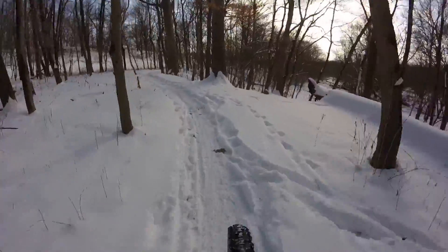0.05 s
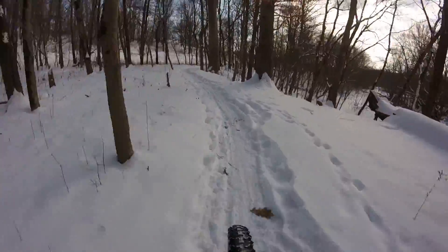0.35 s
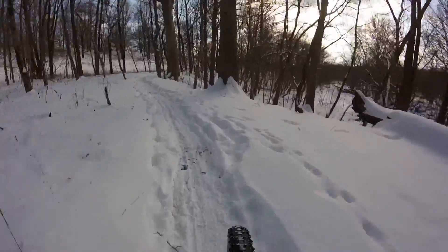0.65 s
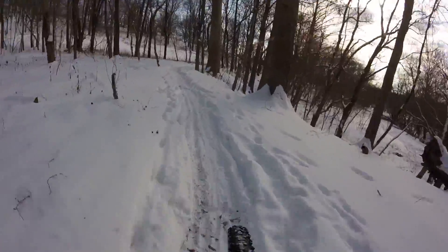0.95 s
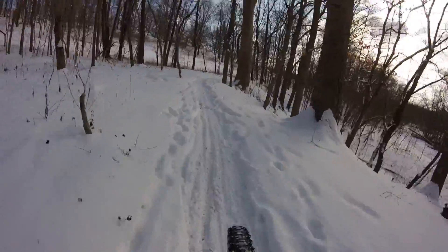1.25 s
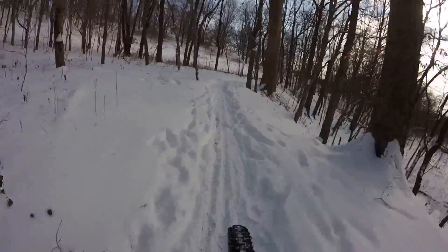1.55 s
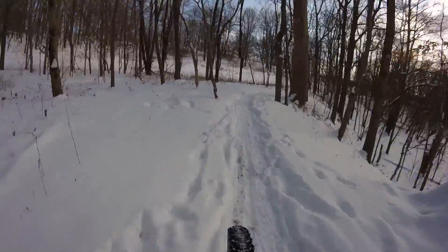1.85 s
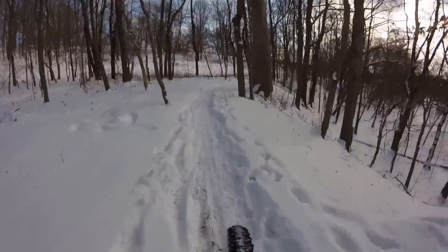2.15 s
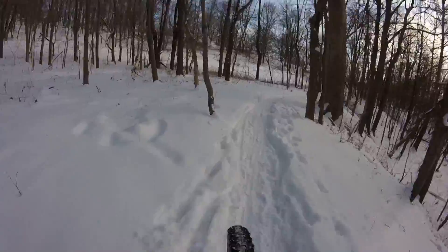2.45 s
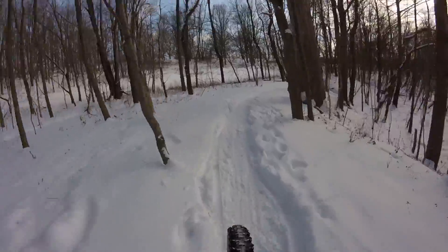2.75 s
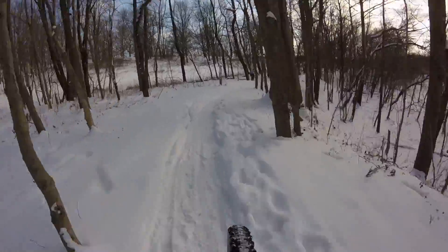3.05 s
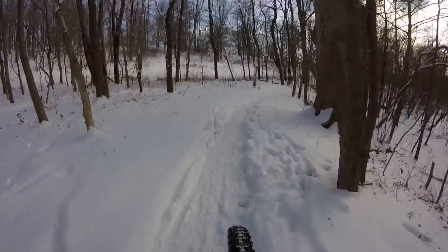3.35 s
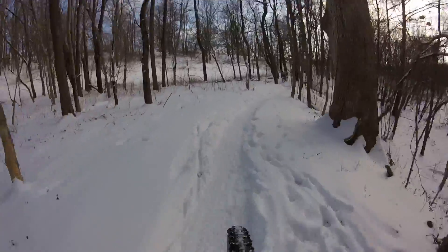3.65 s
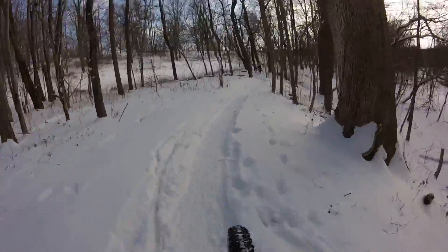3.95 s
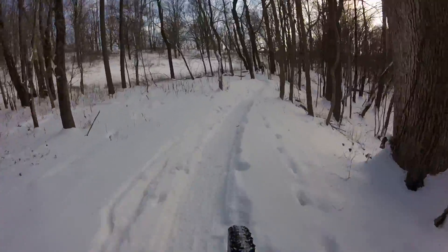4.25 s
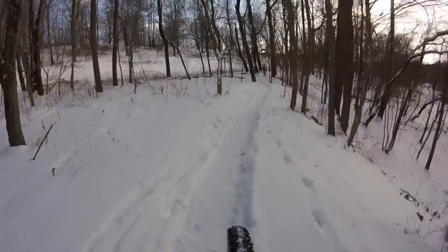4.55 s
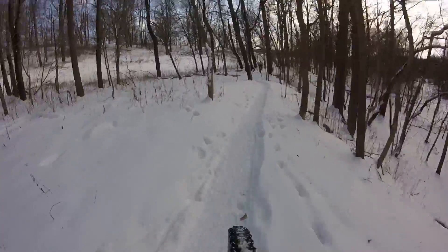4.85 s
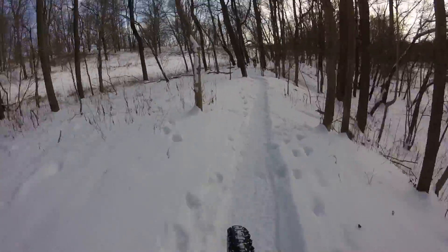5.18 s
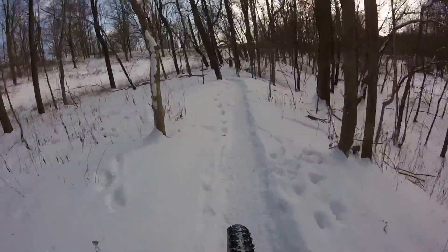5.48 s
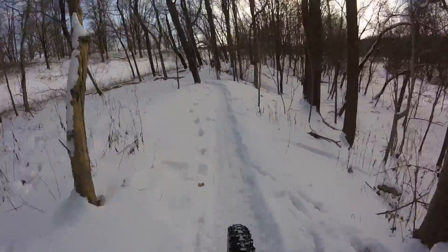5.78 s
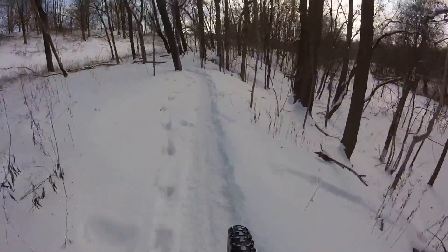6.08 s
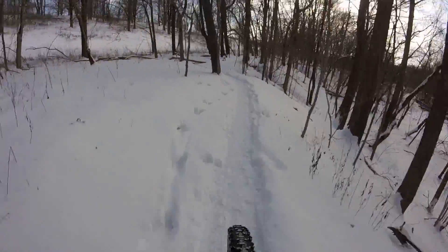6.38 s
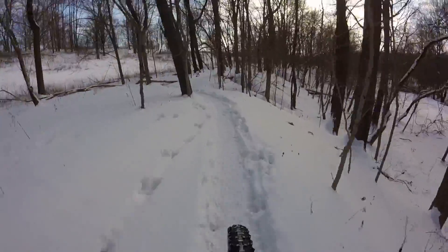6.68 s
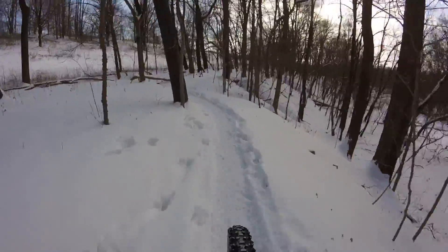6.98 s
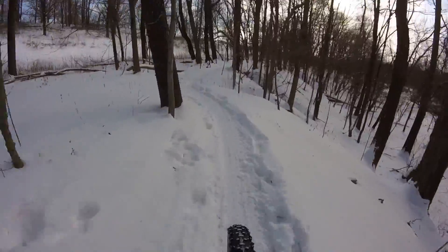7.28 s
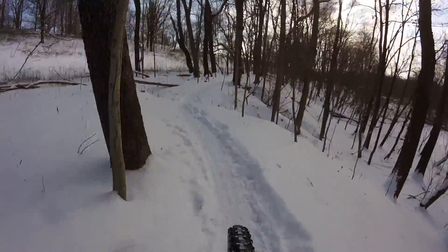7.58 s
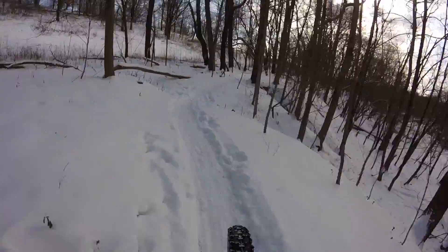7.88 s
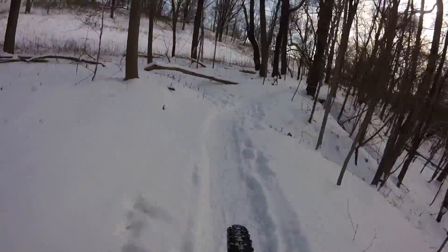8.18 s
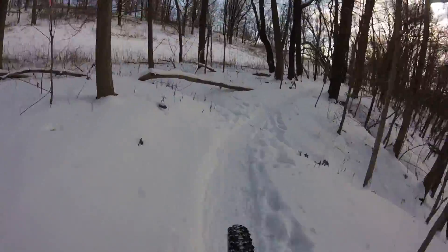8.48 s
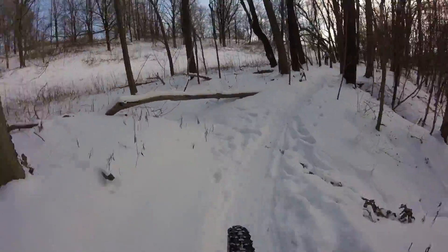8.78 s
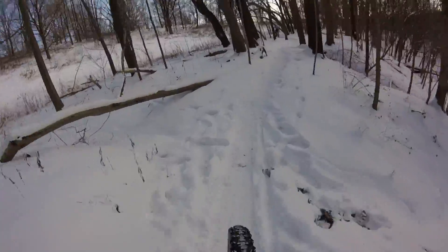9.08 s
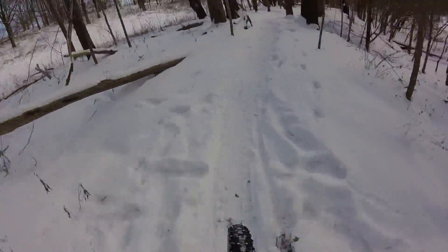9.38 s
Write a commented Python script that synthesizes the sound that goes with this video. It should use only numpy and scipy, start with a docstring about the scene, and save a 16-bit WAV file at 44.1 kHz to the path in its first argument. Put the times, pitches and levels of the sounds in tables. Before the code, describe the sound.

Wind flutters heavily on a bike-mounted microphone while a knobby tyre hums low over softly crunching snow. The bike shakes and rattles all the way: chain and cables chatter lightly, hard clicks strike close by, and a loose part knocks in flurries, busiest about a second in and twice more in the second half. Ruts add hollow thuds, and the hum dips briefly over crests.

```python
"""Mountain bike on packed snow

Heard from a camera on the frame: wind and jolts buffet the microphone, the knobby tyre drones
near 74 Hz, the frame rumbles and snow crunches under the tread. Chain and cables chatter, sharp
ticks hit the camera housing and a loose part knocks in quick runs. Icy clumps burst under the
tyre, and frozen ruts land as dull bumps."""
import sys
import numpy as np
from scipy import signal
from scipy.fft import rfft, irfft
from scipy.io import wavfile
from scipy.ndimage import uniform_filter1d, minimum_filter1d

SR = 44100
rng = np.random.default_rng(int(sys.argv[2]) if len(sys.argv) > 2 else 0)


def wav_out(sig):
    """Save sig, one row per channel (or a flat mono array), as 16-bit PCM at SR to the path in sys.argv[1]."""
    wavfile.write(sys.argv[1], SR, np.round(np.clip(np.atleast_2d(sig).T, -1, 1) * 32767).astype(np.int16))


N = 415863

# How rough the trail rides. Each row: time in seconds, roughness in dB.
TRAIL_ROUGHNESS = [(0.0, -56.5), (0.23, -64), (0.92, -65), (1.23, -51), (1.52, -58), (1.7, -59.5),
                   (4.18, -62.5), (5.02, -53), (6.22, -65.5), (6.46, -52), (6.77, -56.5), (7.22, -64),
                   (7.83, -61), (8.03, -63), (8.17, -59), (8.4, -59.5), (8.64, -59.5), (9.43, -63.5)]
# Dips and ruts that jolt the whole bike. Each row: time in seconds, heave of the buffeting in dB,
# thump of the frame rumble in dB.
TRAIL_JOLTS = [(.07, 3, 3), (0.328, 2.5, 7), (0.662, 11, 6), (1.111, 4.5, 0), (1.281, 4, 9), (1.622, 7, 1),
               (1.88, 4.5, 8), (2.06, 4.5, -2), (2.155, 3, 10), (2.26, 8.5, 6), (3.021, 2, 2), (3.17, 3, 6),
               (3.29, 9, 8), (3.61, 10.5, 10.5), (3.819, 7.5, 6.5), (4.1, 9, 13), (4.41, 3.5, 2),
               (4.609, 7.5, 4), (4.89, 8.5, 2), (5.08, 4.5, 12), (5.34, 5, 6), (5.53, 5, 7), (5.7, 4.5, 9),
               (6.232, 3, 11.5), (6.47, 7, 2), (6.59, 6, 5), (6.85, 5.5, 1), (6.99, 8, 0), (7.201, 8, 2),
               (7.42, 2, 2), (7.583, 10.5, 13.5), (8.07, 6, 7.5), (8.211, -2, 5), (8.45, 9, 4),
               (8.83, 5, 1), (9.166, 6, 7)]
# The tyre goes light over a crest. Each row: time in seconds, half length in seconds, drone dip in dB.
TRAIL_CRESTS = [(0.845, 0.063, -12), (1.392, 0.15, -7.5), (2.14, 0.086, -7), (3.419, 0.042, -17.5),
                (3.908, 0.023, -15), (4.95, 0.32, -4.5), (6.007, 0.052, -12.5), (6.733, 0.15, -5),
                (7.701, 0.11, -14.5), (9.376, 0.03, -15.5)]
# Tread knobs meeting the ground at the bike's speed. Each row: time in seconds, knob rate in Hz.
KNOB_RATE = [(0, 71.5), (.55, 74.5), (.9, 71.5), (2.8, 72), (3.05, 74.5), (4.55, 72), (4.95, 76), (6.1, 71),
             (6.5, 73), (7.45, 68), (8.55, 74), (9.43, 71)]
# Fader rides for the frame rumble and the rolling snow. Each row: time in seconds, base level in dB.
RUMBLE_RIDE = [(0, -37), (.45, -34), (1.2, -34.5), (1.42, -39), (2.3, -35.5), (3.7, -37.5), (4.8, -35),
               (5.6, -35), (6.4, -34), (6.7, -37), (7.4, -33.5), (7.72, -37), (8.2, -33), (8.9, -35),
               (9.43, -34.5)]
SNOW_RIDE = [(0.0, -54), (0.39, -58.5), (0.92, -58.5), (1.15, -53), (1.97, -59), (2.84, -54), (3.02, -59),
             (4.46, -57), (4.91, -55.5), (6.07, -58.5), (6.33, -56), (7.33, -56), (7.75, -57.5),
             (8.46, -57), (8.98, -56), (9.43, -57.5)]

# Hits on the camera housing, knocks of the loose part and icy clumps crushed by the tyre.
# Each row: start in seconds, relative strength in dB.
HOUSING_HITS = [(.0533, -3), (1.278, -11.5), (1.6308, -6), (3.0236, -15.5), (3.2937, 0.5), (4.1192, -0.5),
                (4.5918, -6.5), (4.894, -2), (5.5382, -3.5), (6.468, 4.5), (6.635, -15.5), (6.8425, -3),
                (6.9377, -3.5), (7.5823, -4.5), (8.444, 4), (8.5534, -15), (9.1669, -1)]
LOOSE_KNOCKS = [(0.1047, -18), (0.2048, -25), (0.2567, -29), (0.3786, -19.5), (0.4425, -5.5), (0.599, -21),
                (0.6608, -13.5), (0.7206, -22), (0.7419, -19), (0.913, -27), (0.9364, -13), (1.0188, -3),
                (1.0833, 1), (1.1546, -3), (1.209, -8.5), (1.2473, -19), (1.2825, -2), (1.3421, -14.5),
                (1.3882, -5), (1.4381, 1.8), (1.4873, -2.5), (1.5082, -7.5), (1.5324, -11.5), (1.6348, 2),
                (1.6916, -1.5), (1.7492, -13), (1.8621, -7.5), (1.9165, -13), (1.9456, -9.5),
                (1.9982, -23.5), (2.3622, -25), (2.6347, -0.8), (2.6551, -21), (2.7233, -22), (2.7878, -18),
                (3.3528, -7), (3.3919, -17.5), (3.7291, -15.5), (4.2633, -18.5), (4.4072, -6.5),
                (4.6001, -14), (4.761, -16.5), (4.8324, -16), (4.9302, -22), (5.0849, 1.5), (5.1338, -3.5),
                (5.1514, -21), (5.248, -20), (5.761, -23), (5.9256, -20), (6.2965, -9.5), (6.421, -6.5),
                (6.4714, 4), (6.524, 2.5), (6.578, 0.5), (6.6078, -13.5), (7.2404, -12.5), (7.2871, -9),
                (7.3321, -8), (7.6826, -22.5), (7.954, -10.5), (7.9839, -23.5), (8.2827, -1.5),
                (8.328, 0.5), (8.3731, -2.5), (8.4917, -8), (8.5539, -7.5), (8.609, -19), (8.6635, -14.5),
                (8.6848, -18.5), (8.9121, -18)]
ICY_CLUMPS = [(0.333, -48.5), (0.413, -46), (.676, -41.5), (1.133, -39), (1.187, -37), (1.302, -49),
              (1.317, -39.5), (1.889, -42), (3.593, -47), (3.63, -47), (3.644, -44), (3.666, -38.5),
              (5.289, -42.5), (5.444, -44), (5.689, -41), (5.741, -44), (6.237, -42), (6.561, -38),
              (6.989, -47), (7.017, -48), (7.196, -44.5), (7.219, -41), (7.265, -46), (7.431, -44.5),
              (7.614, -47.5), (8.037, -45.5), (8.087, -39.5), (8.82, -46.5)]
# The tyre hits frozen ruts. Each row: start in seconds, thud level in dB, crack in dB over the thud,
# frame ring in dB over the thud.
RUT_BUMPS = [(0.661, -32, -19, -19), (0.705, -30.5, -7.5, -16), (1.08, -34, -17, -19),
             (1.282, -38, 10, -10), (1.555, -36, -3, -15), (2.279, -31.5, -7, -25),
             (3.022, -32.5, -16, -13.5), (3.302, -34.5, 0.5, -8), (3.821, -31.5, -7.5, -16),
             (4.097, -27, -12, -24), (4.573, -37.5, -23, 1.5), (4.612, -37.5, 2.5, -12),
             (4.897, -32, -10, -10.5), (5.074, -28.5, -29, -11), (5.329, -24, 8.5, 3.5),
             (5.685, -43, -12, -20), (6.573, -31.5, -4, -11), (6.851, -35.5, 0, -15),
             (6.972, -32.5, -9, -12), (7.411, -37.5, -23, 9), (7.59, -31, -10, -18),
             (7.831, -34, -6.5, -11), (8.207, -44.5, -24, 15), (8.466, -31, -4, -12)]

# How the housing, the loose part and the frame ring when struck. Each row: pitch in Hz,
# relative level in dB, seconds to die away by 60 dB, polarity as 1 or -1.
HOUSING_RING = [(1596, -30.5, 0.016, 1), (2030, -33, 0.02, -1), (2350, -29.5, 0.02, 1),
                (3470, -30.5, 0.019, -1), (4820, -31.5, 0.01, 1), (6170, -32.5, 0.0071, -1),
                (6880, -34.5, 0.0087, 1), (9700, -30, 0.0052, -1), (11000, -32, 0.0042, 1),
                (13100, -37, 0.0059, -1), (14100, -43, .004, 1)]
LOOSE_RING = [(750, -44.5, 0.025, -1), (1270, -44.5, 0.069, -1), (1435, -29.5, 0.018, -1),
              (1632, -22.5, 0.028, 1), (1705, -18, 0.019, -1), (2150, -30, 0.017, 1),
              (2596, -18.5, 0.022, -1), (2678, -16, 0.0058, -1), (2996, -12.5, .009, 1),
              (3450, -11.5, 0.0072, 1), (3584, -16.5, 0.0069, -1), (4056, -36.5, 0.035, -1),
              (4840, -34.5, 0.0026, 1), (5420, -37, 0.0072, -1), (6040, -41.5, 0.0064, -1),
              (7250, -47, 0.0043, -1)]
FRAME_RING = [(313, -16, 0.15, 1), (538, -12, 0.12, -1), (789, -3, 0.075, 1), (1060, -20.5, 0.086, -1)]

# Tone curves for the noisy layers. Each row: frequency in Hz, relative gain in dB.
BUFFET_EQ = [(3, -23.5), (7, -15.5), (11, 0), (19, -1), (28, -0.5), (40, -6.5), (52, -11), (62, -8),
             (80, -18), (120, -31), (250, -79.5), (1500, -150)]  # sub-bass wind on the microphone
RUMBLE_EQ = [(60, -17), (90, 4.5), (110, -1), (135, -7.5), (152, -13.5), (160, -4.5), (172, -12.5),
             (215, -14), (290, -26), (400, -34.5), (800, -70.5), (4000, -110)]  # boomy shaking of the frame
SNOW_EQ = [(200, -4.5), (370, -5.5), (480, 4.5), (590, 1.5), (715, -4), (795, 2), (880, -7), (1100, -14),
           (1700, -12.5), (3000, -17), (4500, -26), (7000, -39), (10000, -41.5), (15500, -53)]  # midrange crunch of packed snow
CHATTER_EQ = [(900, -12.5), (1220, -7.5), (1500, -14.5), (1670, 7.5), (1850, -5.5), (2030, 6),
              (2300, -10.5), (2620, -1.5), (3150, -18), (3500, -4.5), (4400, -21), (7000, -22),
              (14000, -53.5)]  # thin, peaky chain and cables
GRIT_EQ = [(150, -10), (300, -1.5), (800, -4.5), (1200, -3), (2200, -8.5), (3500, -20), (5000, -18.5),
           (7000, -30), (8200, -28), (10500, -29.5), (15000, -41.5)]  # broad crackle of hard shaking
SNAP_EQ = [(900, -11), (1600, 4), (2500, -0.5), (3500, 2.5), (5500, -13.5), (7000, -6.5), (8000, -10.5),
           (10000, -9), (15000, -29)]  # bright snap on the housing
CRUNCH_EQ = [(300, -7.5), (800, 0), (1150, -1.5), (1700, 4.5), (2600, -0.5), (3700, 0.5), (4600, -8),
             (7000, -15), (8200, -21.5), (10500, -28.5), (15000, -39.5)]  # crisp break of a clump, also the loose part's scuff
THUD_EQ = [(120, -0.5), (280, 4), (380, 1.5), (530, 3), (680, -4), (795, -4), (900, -8), (1050, -12.5),
           (1300, -15), (3000, -44.5)]  # hollow body of a bump
CRACK_EQ = [(700, -76.5), (1500, 7), (2300, 0), (2750, -2), (3450, 7.5), (4400, -3), (6000, -6.5),
            (8000, -18.5), (14000, -47)]  # hard edge of a bump


def undb(db):
    """Decibels to gain."""
    return 10 ** (np.asarray(db) / 20)


def unit(x):
    """Scale to rms 1."""
    return x / np.sqrt(np.mean(x ** 2))


def curve(table):
    """Join (seconds, value) points into one value per sample."""
    return np.interp(np.arange(N) / SR, *np.transpose(table))


def colour(x, eq):
    """Shape a sound with a minimum-phase tone curve that keeps the power of white noise."""
    size = 16384
    hz, db = np.transpose(eq)
    bins = np.maximum(np.arange(size // 2 + 1) * SR / size, 1)
    cepstrum = irfft(np.log(undb(np.interp(np.log(bins), np.log(hz), db))))
    cepstrum[1:size // 2] *= 2
    cepstrum[size // 2 + 1:] = 0
    response = irfft(np.exp(rfft(cepstrum)))
    return signal.fftconvolve(x, response / np.linalg.norm(response))[:N]


def noise():
    """White noise."""
    return rng.standard_normal(N)


def drift(rate_hz):
    """Smooth random wander with rms 1."""
    bins = np.arange(N // 2 + 1) * SR / N
    return unit(irfft(rfft(noise()) * np.exp(-(bins / rate_hz) ** 2), N))


def even(x, span_s):
    """Ride the slow swells out of a noise, leaving rms near 1."""
    width = max(int(span_s * SR), 2)
    return x / np.sqrt(uniform_filter1d(uniform_filter1d(x ** 2, width), width) + 1e-12)


def grains(per_s, spread_db):
    """Random tiny clicks, mostly small with a few large ones."""
    fires = rng.random(N) < per_s / SR
    size = np.minimum(rng.exponential(size=N), 4)
    return unit(fires * undb(spread_db * size) * np.sign(noise()))


def add(out, s, sound):
    """Mix a sound in at s seconds."""
    i = max(int(s * SR), 0)
    out[i:i + len(sound)] += sound[:max(N - i, 0)]


def swell(s, half_s):
    """Bell-shaped rise to 1 and fall, centred on s seconds."""
    out = np.zeros(N)
    start = max(s - 3 * half_s, 0)
    t = np.arange(int(6 * half_s * SR)) / SR + start
    add(out, start, np.exp(-((t - s) / half_s) ** 2))
    return out


def bursts(events, lead_s, rise_s, decay_s):
    """Attack-and-decay envelope that opens lead_s ahead of each (seconds, dB) event."""
    t, envelope = np.arange(SR // 10) / SR, np.zeros(N)
    for s, db in events:
        add(envelope, s - lead_s, undb(db) * (1 - np.exp(-t / rise_s)) * np.exp(-t / decay_s))
    return envelope


def strike(blows, modes, detune, scatter_db, soften):
    """Each blow rings the modes a little differently; soften makes light blows duller."""
    hz, db, t60, polarity = np.transpose(modes)
    t, out = np.arange(SR // 16)[:, None] / SR, np.zeros(N)
    for s, strength_db in blows:
        pitch, weight = rng.standard_normal((2, len(hz)))
        tilt_db = soften * strength_db * np.log2(hz / np.median(hz))
        gain = np.sign(polarity) * undb(strength_db + db + scatter_db * weight + tilt_db)
        partials = np.exp(-np.log(1000) * t / t60) * np.sin(2 * np.pi * hz * (1 + detune * pitch) * t)
        add(out, s, partials @ gain)
    return out


def jolts():
    """Jolts lift buffeting and rumble, in dB; the level dips briefly just after each jolt."""
    heave_half_s, thump_half_s, lull_delay_s = .035, .02, .09
    heave_db, thump_db = np.zeros((2, N))
    for s, heave, thump in TRAIL_JOLTS:
        lull = 0.27 * swell(s + lull_delay_s, heave_half_s)
        heave_db += heave * (swell(s, heave_half_s) - lull)
        thump_db += thump * (swell(s, thump_half_s) - lull)
    return heave_db, thump_db


def wind_buffet(db):
    """Wind pushes on the microphone in a deep flutter."""
    return even(colour(noise(), BUFFET_EQ), span_s=0.07) * undb(db + 0.89 * drift(11))


def tyre_drone(db):
    """Tread knobs shake the frame at their passing rate; uneven snow wobbles pitch and strength."""
    phase = 2 * np.pi * np.cumsum(curve(KNOB_RATE)) / SR + 0.79 * drift(9.7)
    strength = 1 + 0.36 * drift(7.4) + 0.35 * drift(25)
    tone = np.sin(phase) + undb(-47.5) * np.sin(2 * phase)
    return unit(strength * tone) * undb(db)


def frame_rumble(db):
    """The shaking frame gives a low, restless boom."""
    return even(colour(noise(), RUMBLE_EQ), span_s=0.041) * undb(db + 1.6 * drift(18))


def rolling_snow(db):
    """Packed snow breaks in dense grains and small clumps under the tyre."""
    fractures = grains(per_s=2500, spread_db=3.4)
    return colour(fractures * undb(db + 1.3 * drift(21) + 2.8 * drift(57)), SNOW_EQ)


def chain_chatter(db):
    """Chain and cables tap lightly all the time, in little flurries."""
    taps = grains(per_s=200, spread_db=6.8) + undb(-3.5) * noise()
    return colour(taps * undb(db + 6.6 * drift(35)), CHATTER_EQ)


def shake_grit(shake, heave_db):
    """The hardest swings of the shaking each bring a gritty crackle, loudest during a jolt."""
    gate = np.clip(np.abs(shake) - .4, 0, .2)
    return colour(gate * grains(per_s=2800, spread_db=1.3) * undb(-32 + 0.6 * heave_db), GRIT_EQ)


def housing_ticks():
    """A hard contact snaps against the camera housing and rings it briefly."""
    snap = colour(bursts(HOUSING_HITS, lead_s=0, rise_s=.0001, decay_s=0.0011) * noise(), SNAP_EQ)
    ring = strike(HOUSING_HITS, HOUSING_RING, detune=0.0052, scatter_db=3.0, soften=.03)
    return ring + undb(-22.5) * snap


def light_taps(rough_db):
    """Cues in (seconds, dB): the swinging loose part now and then just touches, harder on rough ground."""
    swing_s, chance, scatter_db = .05, 0.23, 3.5
    turns = np.arange(0, N / SR, swing_s)
    touch, late, size = rng.random((len(turns), 3)).T
    db = -33 + 0.51 * rough_db[(turns * SR).astype(int)] + scatter_db * np.sqrt(12) * (size - .5)
    return list(np.column_stack([turns + late * swing_s / 2, db])[touch < chance])


def loose_part(rough_db):
    """The part scuffs into contact, then knocks; its blunt edge leaves out the highest treble."""
    blows = LOOSE_KNOCKS + light_taps(rough_db)
    contact = bursts(blows, lead_s=0.0021, rise_s=0.0011, decay_s=0.0036)
    scuff = colour(contact * grains(per_s=3400, spread_db=2.8), CRUNCH_EQ)
    ring = strike(blows, LOOSE_RING, detune=0.013, scatter_db=1.91, soften=0.25)
    blunt = signal.butter(4, 8000, fs=SR, output="sos")
    return signal.sosfilt(blunt, undb(-0.55) * ring + undb(-30.5) * scuff)


def icy_crunches():
    """An icy clump gives way in a short burst of fractures."""
    collapse = bursts(ICY_CLUMPS, lead_s=0.0013, rise_s=0.00039, decay_s=0.0033)
    return undb(8.0) * colour(collapse * grains(per_s=6000, spread_db=1.8), CRUNCH_EQ)


def rut_bumps():
    """A rut crushes in milliseconds: a hollow thud, a shorter crack and a brief ring of the frame."""
    s, db, crack_db, ring_db = np.transpose(RUT_BUMPS)
    thud = bursts(zip(s, db), lead_s=0.00043, rise_s=0.00024, decay_s=0.0072) * noise()
    crack = bursts(zip(s, db + crack_db), lead_s=.0003, rise_s=0.00065, decay_s=0.0031) * noise()
    ring = strike(zip(s, db + ring_db), FRAME_RING, detune=.006, scatter_db=2, soften=0)
    return colour(thud, THUD_EQ) + colour(crack, CRACK_EQ) + ring


def scene():
    """Mono mix: rough ground lifts the rattles, jolts the shake and snow; crests duck drone, wind, snow."""
    trail_db = curve(TRAIL_ROUGHNESS)
    rough_db = trail_db - trail_db.mean()
    heave_db, thump_db = jolts()
    crest_db = sum(db * swell(s, half_s) for s, half_s, db in TRAIL_CRESTS)
    duck_db = 0.26 * crest_db  # wind and snow take a share of the drone's dip
    wind = wind_buffet(-15 + 0.089 * rough_db + heave_db + duck_db)
    shake = wind + tyre_drone(-15 + crest_db) + frame_rumble(curve(RUMBLE_RIDE) + thump_db)
    snow = rolling_snow(2.5 + curve(SNOW_RIDE) + 0.56 * heave_db + duck_db)
    ground = snow + icy_crunches() + rut_bumps()
    rattles = chain_chatter(-64 + 0.78 * rough_db) + loose_part(rough_db) + housing_ticks()
    return (shake + shake_grit(shake, heave_db) + ground + rattles)[None]


def record(dry):
    """The camera's limiter eases the gain down around the highest peaks; the top end is cut."""
    ceiling, top_hz, width = .85, 15700, SR // 40
    safe_gain = np.minimum(1, ceiling / (np.abs(dry) + 1e-9))
    held_gain = minimum_filter1d(safe_gain, 2 * width)
    gain = uniform_filter1d(uniform_filter1d(held_gain, width), width)
    high_cut = signal.ellip(8, .2, 70, top_hz, fs=SR, output="sos")
    return signal.sosfilt(high_cut, dry * gain)


dry = scene()
out = record(dry)
wav_out(out)
```